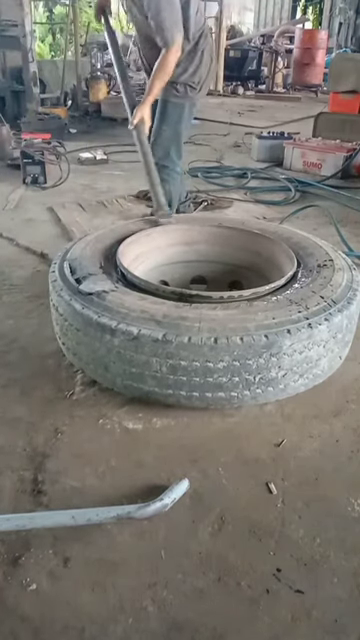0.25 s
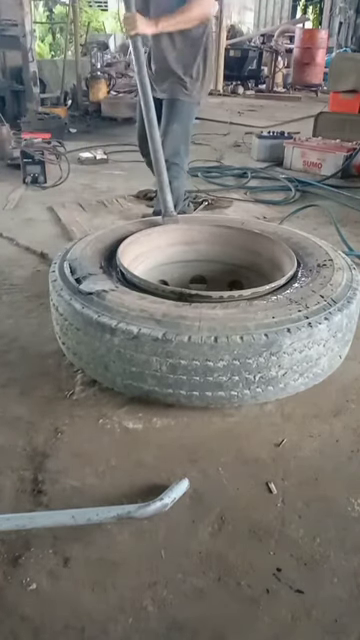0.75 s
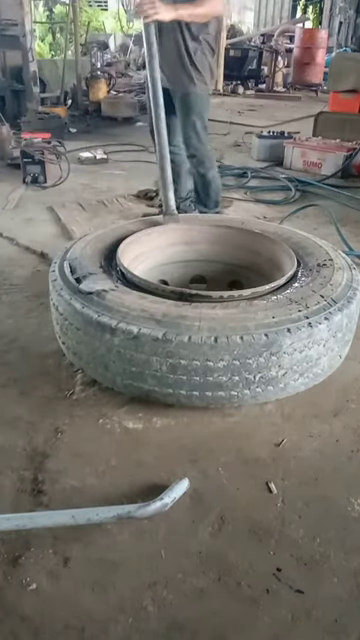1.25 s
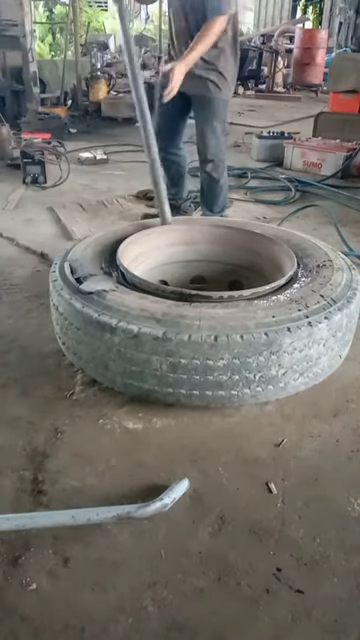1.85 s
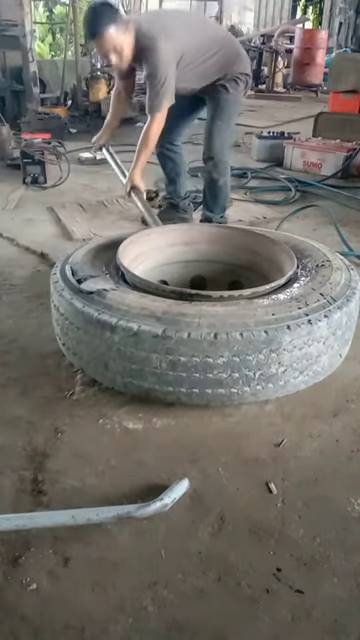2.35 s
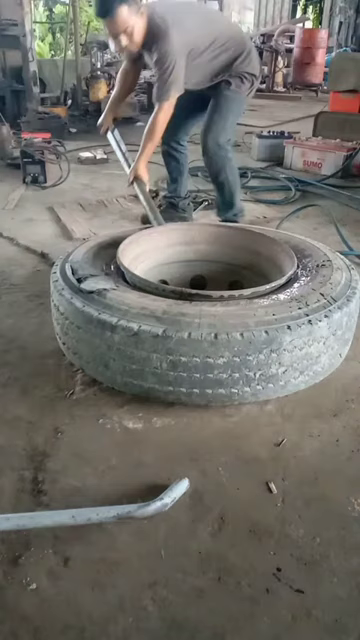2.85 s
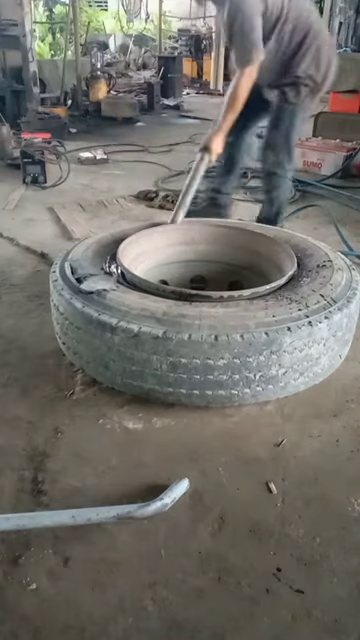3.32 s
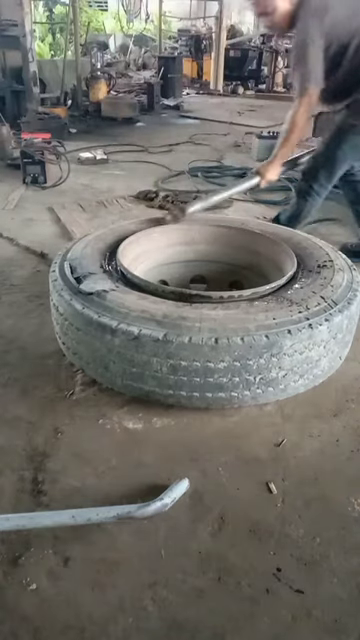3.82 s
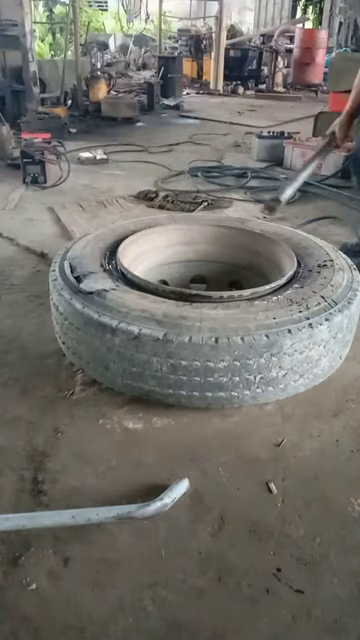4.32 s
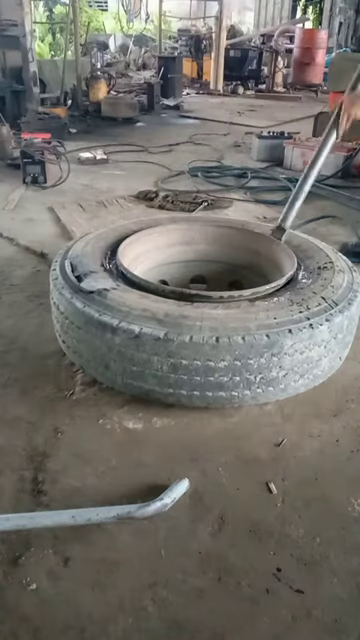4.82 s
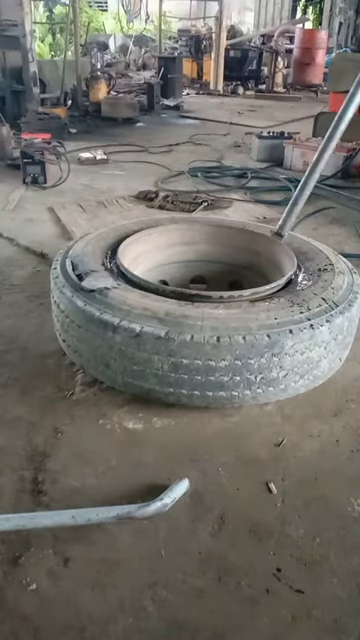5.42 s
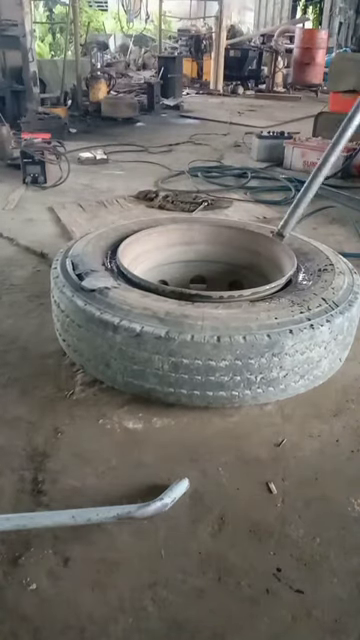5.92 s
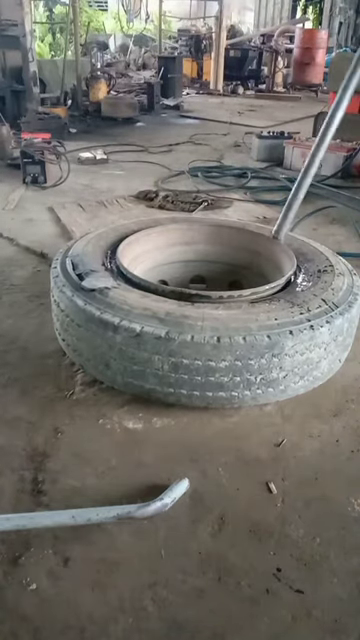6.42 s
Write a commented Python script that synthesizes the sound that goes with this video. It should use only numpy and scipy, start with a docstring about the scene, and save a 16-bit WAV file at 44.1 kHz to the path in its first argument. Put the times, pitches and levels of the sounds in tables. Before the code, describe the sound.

A steel lever clangs against a truck wheel rim in a reverberant workshop, while cicadas buzz faintly outside.

```python
"""A long steel tyre lever is jabbed and prised against the rim of a truck wheel on a workshop floor.
Each impact excites the normal modes of lever and rim, which clang, and of the tyre, which thuds; the
tin-roofed shed reverberates. The tip squeaks by stick-slip friction, and the freed lever sings on.
Outside, cicadas buzz with their timbals over a quiet yard. A limiter ducks on the hardest blows
and lets their tails swell back."""
import sys
import numpy as np
from scipy import signal
from scipy.fft import rfft, irfft, next_fast_len
from scipy.io import wavfile
from scipy.ndimage import uniform_filter1d, minimum_filter1d, map_coordinates

SR = 44100
rng = np.random.default_rng(int(sys.argv[2]) if len(sys.argv) > 2 else 0)


def to_wav(s):
    """Save 16-bit WAV."""
    ch = np.atleast_2d(s).T  # columns
    pcm = np.round(np.clip(ch, -1, 1) * 32767)  # PCM
    wavfile.write(sys.argv[1], SR, pcm.astype(np.int16))


N = 294129


def amp(db):
    """Amplitude ratio of a level in decibels."""
    return 10 ** (np.asarray(db) / 20)


def unit(x):
    """Normalisation to rms 1."""
    return x / np.sqrt(np.mean(x ** 2) + 1e-20)


def along(points, hz):
    """Interpolation of (f/Hz, value) points on a logarithmic frequency axis."""
    f, v = np.transpose(points)
    return np.interp(np.log(hz + 1), np.log(f + 1), v)


def filtered(x, response):
    """Linear filtering: the spectrum of x times a frequency response."""
    size = next_fast_len(len(x) + 8192)
    return irfft(rfft(x, size) * response(np.fft.rfftfreq(size, 1 / SR)), size)[:len(x)]


def noise(spectrum, size):
    """Spectral shaping of white noise, at rms 1."""
    return unit(filtered(rng.standard_normal(size), lambda hz: amp(along(spectrum, hz))))


def fade(t, t60):
    """Exponential decay, 60 dB down at t60."""
    return np.exp(-np.log(1000) * t / t60)


def ringing(t, hz, gain, t60):
    """Modal superposition: damped sinusoids at random phases."""
    phase = rng.uniform(0, 2 * np.pi, len(hz))
    return sum(g * np.sin(2 * np.pi * f * t + p) * fade(t, d) for f, g, p, d in zip(hz, gain, phase, t60))


def tilt(hz, bright_db):
    """Contact stiffness: a hard contact favours the high modes, a soft one the low."""
    return amp(bright_db * np.log2(np.clip(hz, 500, 8000) / 3000))


def contacts():
    """Impact and rebound: each blow, and the weaker clap of the lock ring if it is kicked loose."""
    # (t/s, lever level/dB, rim level/dB, tyre level/dB, tilt/(dB/octave), chatter/s, rebound delay/s)
    blows = [(-0.2, -27, -8, -31, 4.5, 0.017, 0), (0.058, -67.5, -82, -36, -17, 0.013, 0),
             (0.451, -14.5, -6.5, -4.5, -0.5, 0.0096, 0.022), (1.623, 14, 8, 9, 2, 0.022, .015),
             (2.074, -26, -27.5, -30, -1.5, 0.011, 0), (2.258, -48, -40.5, -28, -8, 0.024, 0.00033),
             (2.364, -41, -27, -65, 2.5, 0.0097, 0), (3.245, -48, -46, -43, -0.5, 0.043, 0),
             (3.765, -35, -26, -29, 1, 0.064, 0.00017), (3.839, -18.5, -15, -15, -4.5, 0.0042, 0),
             (3.854, -12.5, -4.5, -14, 1, 0.0095, 0.00018), (4.651, -11, -16, -50, 3.5, 0.026, .024),
             (4.749, -46.5, -6, -7, 0.5, .018, 0.016), (5.118, -88, -75, -35.5, -17.5, 0.018, 0.00023),
             (5.532, -8.5, -7, -23, 2, 0.002, 0.027), (5.795, -12.5, -2, -17.5, 1, .013, 0),
             (6.315, -31, -58, -40, 5, 0.0062, 0.00041), (6.374, 8, 4.5, 8, 1.5, 0.0096, 0.012),
             (6.404, 4.5, 6, -4, 1.5, 0.032, 0), (6.434, -10, -12, 1, 1.5, .011, 0.00013)]
    # rebound relative to its blow: (lever level/dB, rim level/dB, tyre level/dB)
    rebound_db = [-8.5, -3, -6]
    rim_held, rim_loose = 0.6, 0.83  # shares of the free ring time: the pressed lever damps the rim
    for s, *levels_db, bright_db, chatter, rebound_s in blows:
        yield s, *levels_db, bright_db, chatter, rim_held
        if rebound_s > 0.005:
            yield s + rebound_s, *np.add(levels_db, rebound_db), bright_db, chatter * 1.53, rim_loose


def steel(t, modes, clash, bright_db, chatter, free, ring_db, clash_t60, width_hz, between_db):
    """Damping broadens resonance: struck steel gives a noisy clash as it chatters, then clear modes."""
    hz, db, t60 = np.transpose(modes)
    strike_db = rng.normal(0, 1.6, len(hz))
    gain = amp(db + ring_db + strike_db) * tilt(hz, bright_db)
    twin_hz = hz + rng.normal(0, 6.53, len(hz))  # out-of-round steel splits each mode into a beating pair
    ring = ringing(t, hz, gain, t60 * free) + ringing(t, twin_hz, amp(-3.5) * gain, t60 * free)
    peaks = lambda f: sum(g / (1 + ((f - f0) / width_hz) ** 2) for f0, g in zip(hz, amp(strike_db)))
    burst = unit(filtered(noise(clash, len(t) // 2), lambda f: amp(between_db) + peaks(f)))
    burst = filtered(burst, lambda f: tilt(f, bright_db))
    burst = np.pad(burst, (0, len(t) - len(burst)))
    clash_s = clash_t60 * (chatter / 0.014) ** 0.23  # a short contact has a shorter clash
    return ring * np.sqrt(np.minimum(t / chatter, 1)) + burst * fade(np.maximum(t - chatter, 0), clash_s)


def lever(t, level_db, bright_db, chatter):
    """Bending vibration of a bar: a harder blow throws the lever clear, so it rings longer."""
    # bending and wall modes: (f/Hz, level/dB, free t60/s)
    modes = [(755, -7, .8), (901, -12, .6), (1441, -1, .9), (1590, -8, .8), (2266, -6, .55),
             (2906, -12, .6), (3211, -9, .7), (4146, -8, .65), (4741, -4, .6), (4916, -4, .55),
             (5045, -9, .55), (5201, -1, .7), (5303, -3, .55), (5455, -4, .6), (5677, -4, .65),
             (5969, -2, .55), (6120, -9, .5), (6330, 0, .55), (6480, -11, .5), (6852, -8, .45),
             (7241, -4, .45), (7970, -11, .55), (8650, -12, .6), (9345, -19, .6), (9814, -21, .5),
             (10210, -19, .45), (10690, -24, .55), (11790, -23, .55), (14200, -24, .45)]
    # crowded, quickly damped overtones: (f/Hz, spectrum level/dB)
    clash = [(250, -47), (700, -1.5), (1100, -6.5), (1500, -7), (3300, -2.5), (4350, -9.5), (5300, -5),
             (7200, -8.5), (9100, -22.5), (10000, -25.5), (12500, -31.5), (15500, -21)]
    free = np.clip(0.63 + 0.017 * level_db, 0.42, 1)  # share of the free ring time
    return steel(t, modes, clash, bright_db, chatter, free,
                 ring_db=-10, clash_t60=0.22, width_hz=30, between_db=-10)


def rim(t, bright_db, chatter, free):
    """Normal modes of a steel ring: the rim clangs for a share of its free ring time."""
    # modes of rim and lock ring: (f/Hz, level/dB, free t60/s)
    modes = [(697, -11, .4), (963, -4, .3), (1012, -8, .3), (1225, -8, .4), (1400, -5, .35),
             (1492, -4, .35), (1550, -4, .4), (1802, 1, .55), (1950, -2, .5), (2033, -1, .45),
             (2126, -2, .42), (2440, -6, .4), (2524, 0, .58), (2615, -5, .5), (3049, 2, .38),
             (3245, -7, .4), (3365, -4, .4), (3447, -3, .4), (3641, -3, .4), (3737, -9, .45),
             (4292, -12, .48), (5145, -9, .3), (5423, -13, .35), (5857, -13, .35), (7428, -16, .3),
             (8625, -25, .4), (10950, -31, .3)]
    # crowded, quickly damped overtones: (f/Hz, spectrum level/dB)
    clash = [(100, -38), (400, -5), (580, -9), (950, -3), (1900, -0.5), (2300, -3.5), (2800, -1.5),
             (3350, -1.5), (4250, -11.5), (5300, -9), (7000, -8), (10500, -27), (12500, -43), (15500, -31)]
    return steel(t, modes, clash, bright_db, chatter, free,
                 ring_db=-13.5, clash_t60=0.15, width_hz=14.8, between_db=-11.5)


def tyre(t, bright_db, chatter, free=0.66, ring_db=-11):
    """Cavity resonance under damped rubber: a blow thuds, a soft push mostly stirs the deep boom."""
    # modes of air cavity and carcass: (f/Hz, level/dB, free t60/s)
    modes = [(71.7, 0.5, 0.52), (84, -3.5, 0.72), (116, -31, .35), (160.6, -1.5, 0.48), (232, -15, 0.24),
             (306.7, -9.5, 0.79), (392, -6.5, 0.58), (423.8, -3.5, 0.45)]
    # thud of the rubber: (f/Hz, spectrum level/dB)
    spectrum = [(25, -39), (50, -55), (70, 5), (105, -13.5), (160, 3.5), (250, -5), (420, -4.5),
                (620, -18.5), (1500, -5), (5000, -81)]
    hz, db, t60 = np.transpose(modes)
    dull = lambda f: amp(0.5 * min(bright_db, 0) * np.log2(np.maximum(f / 150, 1)))
    thud = filtered(noise(spectrum, len(t)), dull) * fade(np.maximum(t - chatter, 0), t60=0.042)
    boom = ringing(t, hz, amp(db + ring_db + bright_db * np.log2(hz / 150)), t60 * free)
    return (thud + boom) * (1 - np.exp(-t / 0.0064))


def shed(x, wet_db, build_s):
    """Reverberation: reflections from walls and roof build a diffuse tail behind the direct sound."""
    # reverberation time: (f/Hz, t60/s)
    decay = [(70, 0.61), (200, 0.57), (600, 0.52), (2500, 0.69), (6000, 0.63), (14000, 0.44)]
    hz, t, spectra = signal.stft(rng.standard_normal(SR), SR, nperseg=256)
    tail = signal.istft(spectra * fade(t, along(decay, hz)[:, None]), SR, nperseg=256)[1]
    tail *= 1 - np.exp(-np.arange(len(tail)) / SR / build_s)
    return x + amp(wet_db) * signal.fftconvolve(x, tail / np.linalg.norm(tail))[:len(x)]


def wheel():
    """Impact excitation: each contact rings lever and rim and shakes the tyre against the concrete."""
    t = np.arange(SR) / SR
    out = np.zeros(N + 3 * SR)  # starts a second early, for a blow that is still ringing
    for s, lever_db, rim_db, tyre_db, bright_db, chatter, rim_free in contacts():
        blow = amp(lever_db) * lever(t, lever_db, bright_db, chatter)
        blow += amp(rim_db) * rim(t, bright_db, chatter, rim_free)
        blow += amp(tyre_db) * tyre(t, bright_db, chatter)
        if max(lever_db, rim_db, tyre_db) < -25:  # a light touch swells as a scrape
            blow *= np.minimum(t / chatter, 1)
        out[SR + round(s * SR):][:len(t)] += shed(blow, wet_db=-7, build_s=0.021)
    return amp(-8.5) * out[SR:SR + N]


def wobble(rate):
    """Slow random modulation: a smooth curve with rate knots a second."""
    return map_coordinates(rng.standard_normal(int(N * rate / SR) + 4), [np.arange(N) * rate / SR])


def far_cicadas(depth_db):
    """Incoherent summation: distant cicadas merge into a buzz whose spectral patches come and go."""
    # the buzz: (f/Hz, spectrum level/dB)
    buzz = [(2500, -22.5), (3200, -2), (3800, -9), (4400, -2.5), (5200, -1), (6100, 2.5), (6600, 3),
            (7500, -8.5), (8500, -7.5), (10000, -20), (11200, -35)]
    spectra = signal.stft(noise(buzz, N), nperseg=512)[2]
    patches = uniform_filter1d(rng.standard_normal(spectra.shape), size=5, axis=0)
    patches = uniform_filter1d(patches, size=24, axis=1)
    return unit(signal.istft(spectra * amp(depth_db * unit(patches)), nperseg=512)[1][:N])


def timbal_clicks(rate, click_s):
    """Shot noise: the complex envelope of many random clicks, each swelling and ringing briefly."""
    hit = rng.random(N) < rate / SR
    strength = rng.standard_normal(N) + 1j * rng.standard_normal(N)
    t = np.arange(SR // 20) / SR
    envelope = signal.fftconvolve(hit * strength, (t * fade(t, click_s)) ** 2)[:N]
    return envelope / np.std(envelope.real)


def cicadas():
    """Timbal resonance: three groups swell together and wander in pitch; far ones partly follow."""
    # course of the chorus: (t/s, level/dB, lean towards the high group/dB)
    chorus = [(0, -29.9, -3.2), (0.28, -38.5, 0.9), (0.6, -29.5, 2.5), (0.85, -40.5, 2.46),
              (1.02, -34, -2.6), (1.17, -41.5, 0.7), (1.4, -35, -0.2), (1.6, -41, -0.5), (2.3, -31.5, 3),
              (2.62, -37.5, 0.9), (3.079, -33.5, 1.6), (3.421, -39, -4.5), (3.66, -39.5, 4.5),
              (4.35, -38, -2.3), (5.15, -32.5, 5.5), (5.421, -41, -2), (6.02, -30.2, 5), (6.301, -33, 1.6)]
    # each group's voice: (f/Hz, click time scale/s, level/dB)
    timbals = [(4720, 0.0049, -11), (5130, 0.012, -5.5), (5595, 0.0093, -11.5)]
    lean_hz_per_db, drift_db = 12, 1.7
    s, *columns = np.transpose(chorus)
    level_db, lean_db = [np.interp(np.arange(N) / SR, s, c) for c in columns]
    out = amp(-48.5 + 0.63 * (level_db - level_db.mean())) * far_cicadas(depth_db=4.5)
    for (hz, click_s, db), side in zip(timbals, (-1, 0, 1)):
        pitch_hz = hz * (1 + 0.0076 * wobble(rate=6)) + lean_hz_per_db * lean_db
        phase = 2 * np.pi * np.cumsum(pitch_hz) / SR
        voice = (timbal_clicks(rate=2500, click_s=click_s) * np.exp(1j * phase)).real
        out += amp(level_db + side * lean_db + db + drift_db * wobble(rate=7)) * voice
    return out


def yard():
    """Stationary noise: the faint background outside."""
    # distant background: (f/Hz, spectrum level/dB)
    spectrum = [(25, -10), (50, -11.5), (95, 0.5), (140, -13), (350, -11.5), (1000, -8), (1450, 2),
                (2100, -10.5), (4000, -8.5), (10000, -14.5), (11300, -25.5), (16000, -27)]
    return amp(-52.5) * noise(spectrum, N)


def squeaks():
    """Stick-slip friction: the tip on the steel drives one narrow, wavering resonance at a time."""
    # slips of the tip: (t/s, f/Hz, level/dB, duration/s)
    slips = [(0.098, 1220, -45.5, 0.055), (0.217, 1475, -44.5, 0.086), (0.268, 1067, -48, 0.066),
             (2.935, 3000, -52, 0.064), (3.06, 3440, -52, 0.12), (3.289, 3167, -47.5, 0.076),
             (3.764, 2511, -40.5, 0.034), (5.415, 3473, -48.5, 0.097)]
    half_width = 0.035  # of the resonance, as a share of its frequency
    out = np.zeros(N + SR)
    for s, hz, db, length in slips:
        size = int(length * SR)
        resonance = lambda f: 1 / (1 + ((f - hz) / (half_width * hz)) ** 2)
        tone = unit(filtered(rng.standard_normal(size), resonance))
        out[round(s * SR):][:size] += amp(db) * tone * np.sin(np.pi * np.arange(size) / size)
    return shed(out[:N], wet_db=-14.5, build_s=0.0037)


def singing_lever():
    """Free vibration: clear of the rim, the lever holds two beating notes until a touch damps them."""
    # the lever springs clear: (t/s, level/dB, t60/s, time free/s)
    releases = [(3.854, -26.5, 2.3, .64), (5.792, -25.5, 0.78, .5), (6.403, -11, 2.7, .8)]
    # lightly damped mode pairs: (f/Hz, level/dB)
    pairs = [(1211, -4.5), (1213.5, -10.5), (1586, -12), (1590, -15)]
    t = np.arange(SR) / SR
    hz, db = np.transpose(pairs)
    out = np.zeros(N + 2 * SR)
    for s, level_db, t60, free_s in releases:
        notes = ringing(t, hz, amp(db + level_db), np.full(len(hz), t60)) * (1 - np.exp(-t / 0.0086))
        out[round(s * SR):][:len(t)] += notes * fade(np.maximum(t - free_s, 0), t60=0.22)
    return out[:N]


def scene():
    """Superposition of the work on the wheel, the cicadas and the yard."""
    return (wheel() + singing_lever() + squeaks() + cicadas() + yard())[None]


def limiter(x, ceiling_db, ahead_s, hold_s, release_db_per_s):
    """Look-ahead gain control: the gain drops just before a loud blow, holds, then climbs back."""
    level_db = 10 * np.log10(np.abs(uniform_filter1d(x ** 2, size=256)) + 1e-12)
    need_db = np.minimum(ceiling_db - level_db, 0)
    span, lead = int((ahead_s + hold_s) * SR), int(ahead_s * SR)
    held_db = minimum_filter1d(need_db, span, origin=(span - 1) // 2 - lead)
    climb_db = release_db_per_s * np.arange(N) / SR
    gain_db = np.minimum.accumulate(held_db - climb_db) + climb_db
    return x * amp(uniform_filter1d(gain_db, size=128))


def record(dry):
    """Band limiting and compression: bass cut, limiter, soft saturation and treble cut."""
    low_hz, top_hz = 55, 16000
    x = signal.sosfilt(signal.butter(3, low_hz, "highpass", fs=SR, output="sos"), dry[0])
    x = limiter(x, ceiling_db=-9.5, ahead_s=0.022, hold_s=0.13, release_db_per_s=90.5)
    x = x / (1 + np.abs(x / 0.9) ** 6) ** (1 / 6)
    return filtered(x, lambda hz: hz < top_hz)[None]


dry = scene()
out = record(dry)
to_wav(out)
```